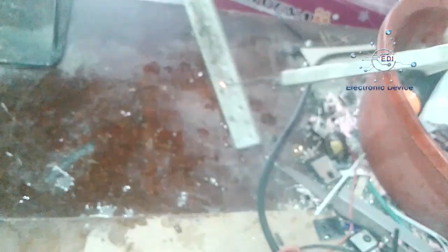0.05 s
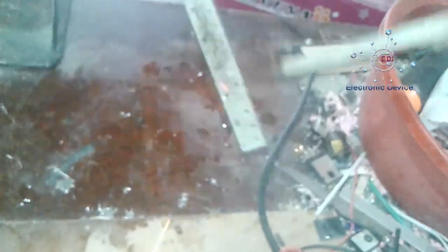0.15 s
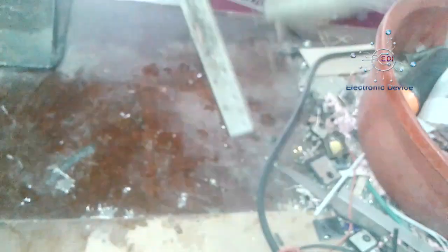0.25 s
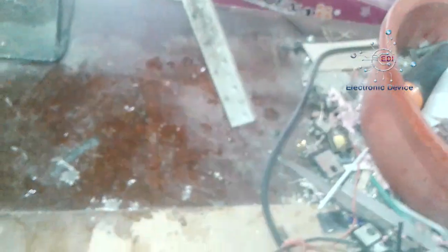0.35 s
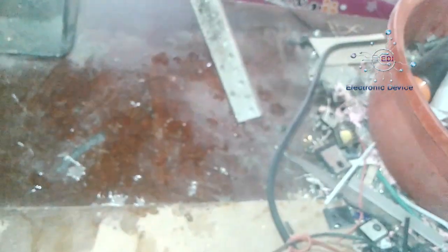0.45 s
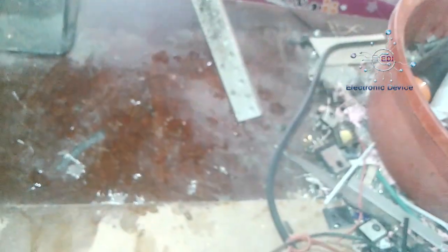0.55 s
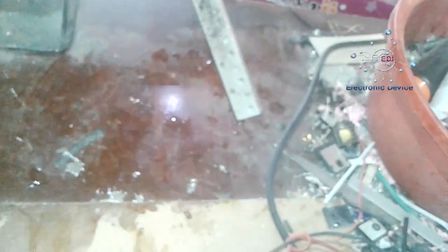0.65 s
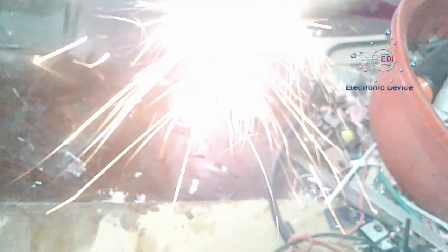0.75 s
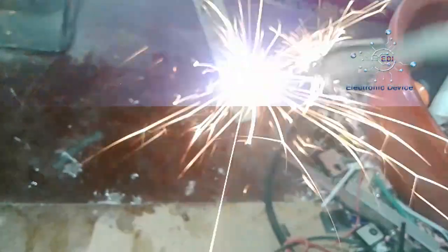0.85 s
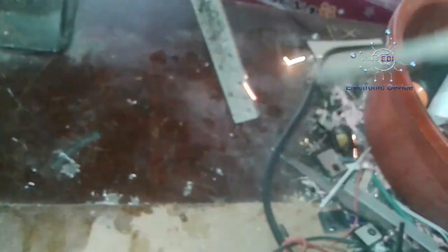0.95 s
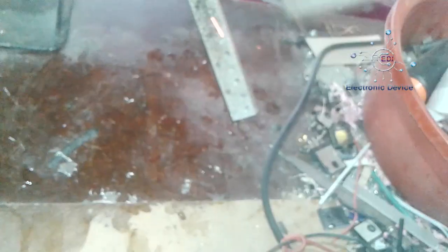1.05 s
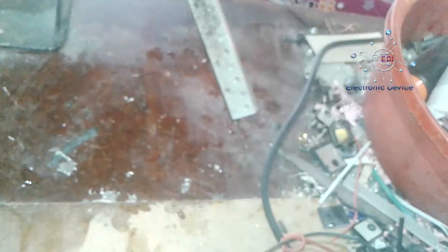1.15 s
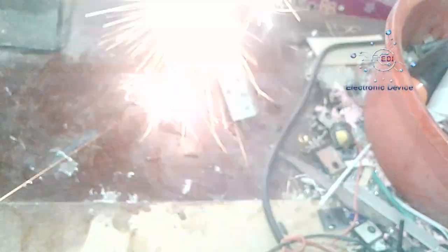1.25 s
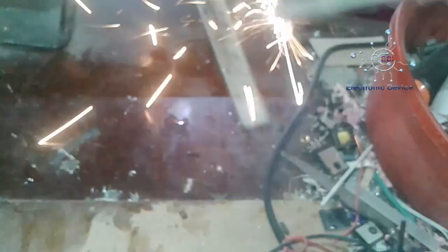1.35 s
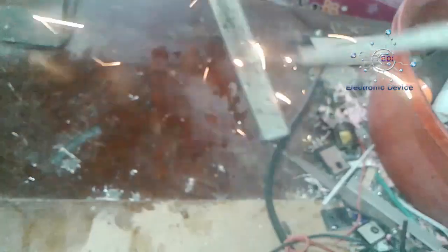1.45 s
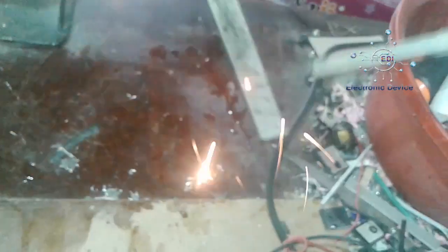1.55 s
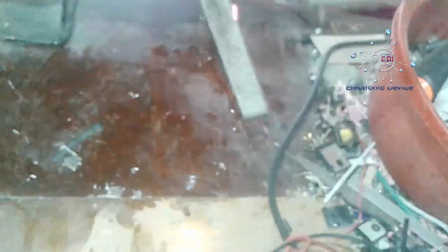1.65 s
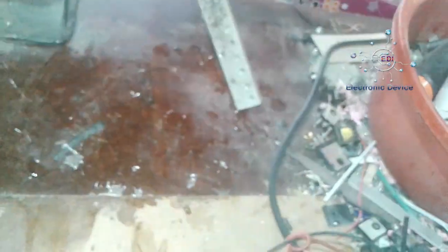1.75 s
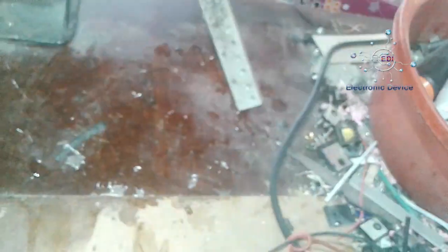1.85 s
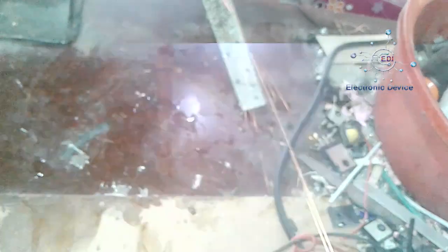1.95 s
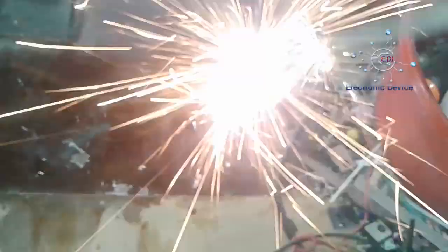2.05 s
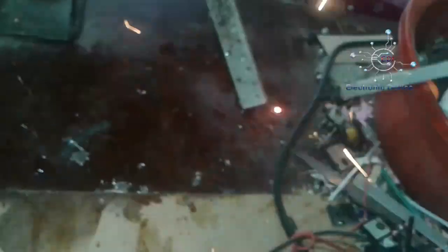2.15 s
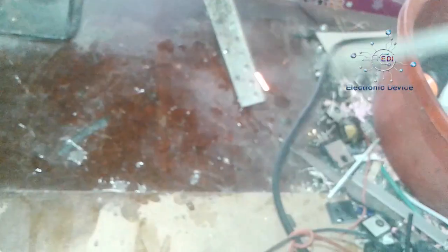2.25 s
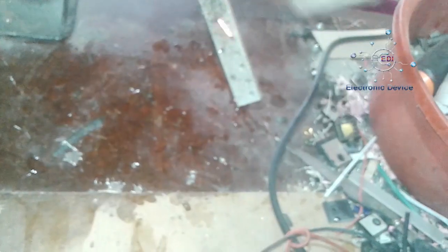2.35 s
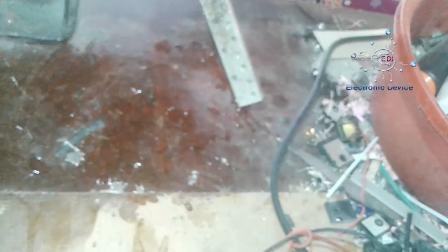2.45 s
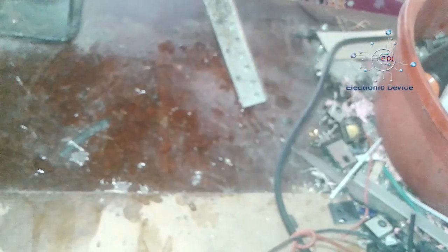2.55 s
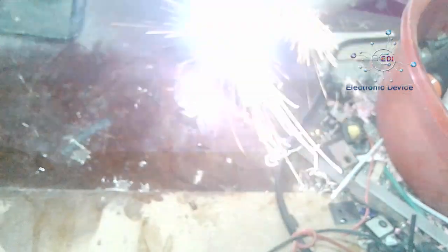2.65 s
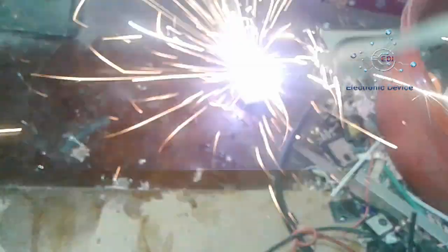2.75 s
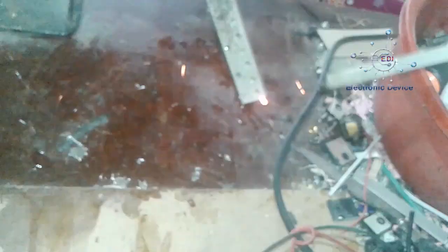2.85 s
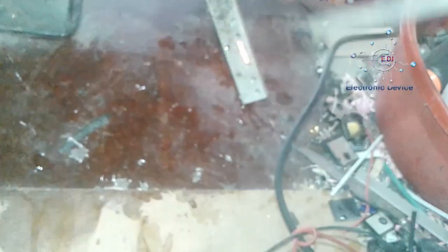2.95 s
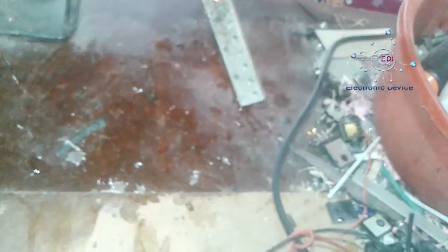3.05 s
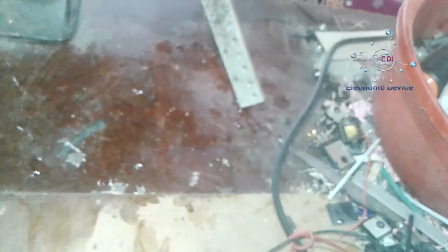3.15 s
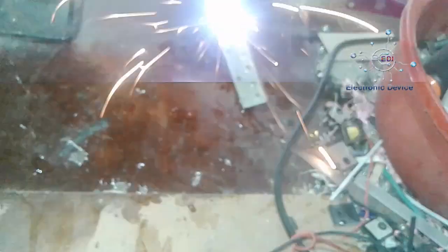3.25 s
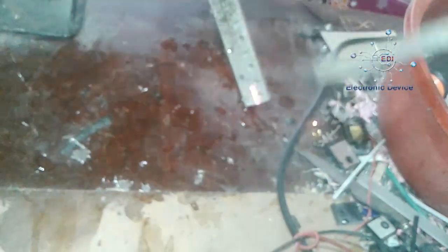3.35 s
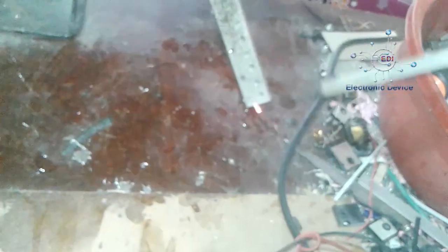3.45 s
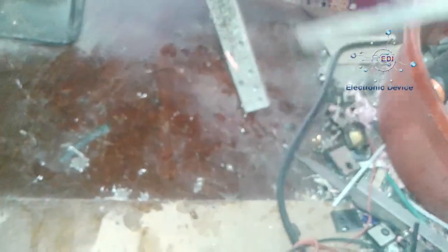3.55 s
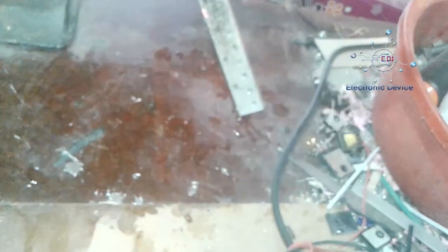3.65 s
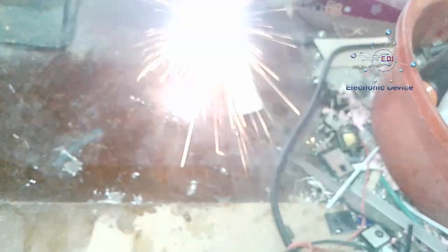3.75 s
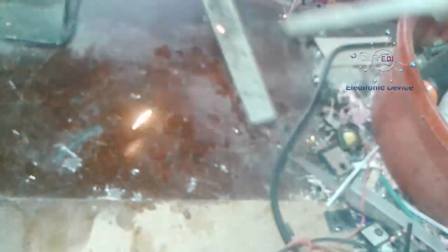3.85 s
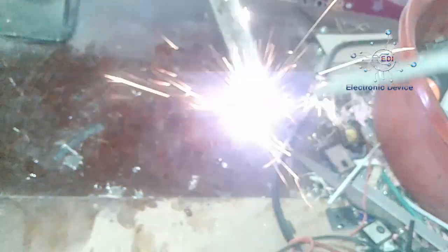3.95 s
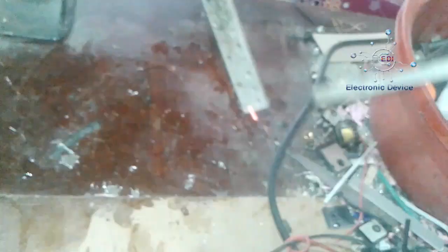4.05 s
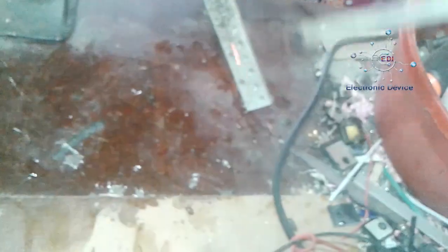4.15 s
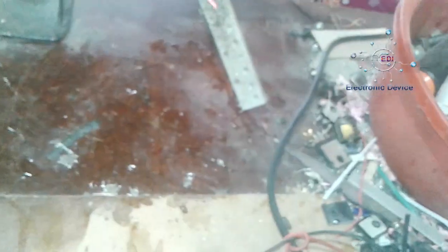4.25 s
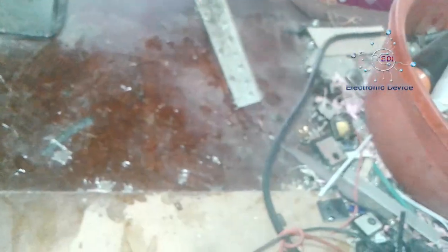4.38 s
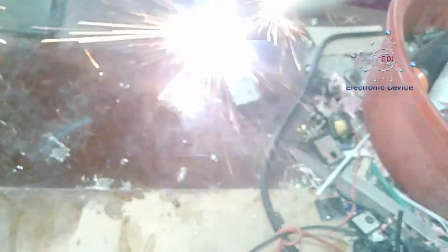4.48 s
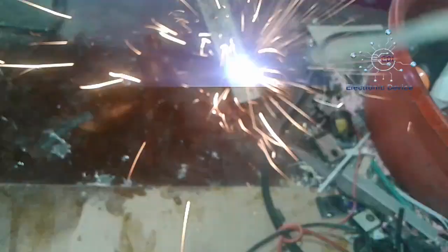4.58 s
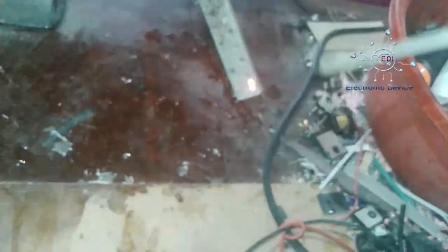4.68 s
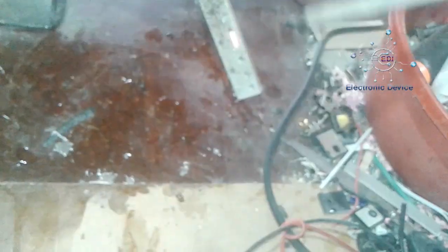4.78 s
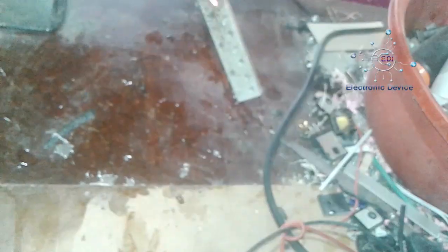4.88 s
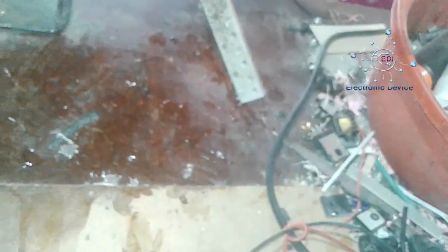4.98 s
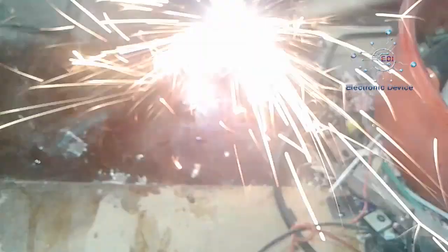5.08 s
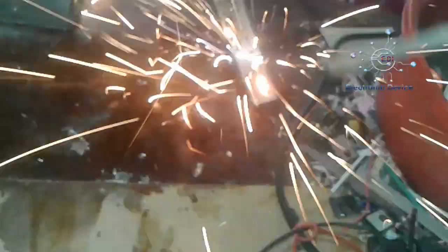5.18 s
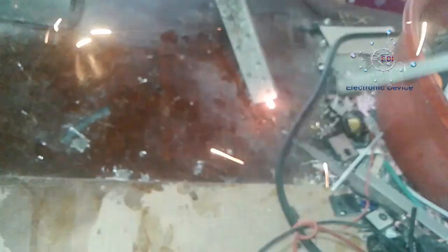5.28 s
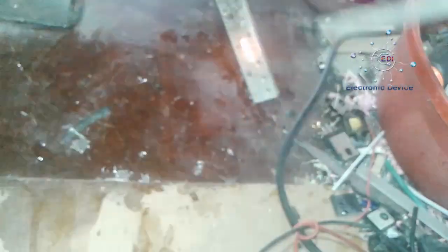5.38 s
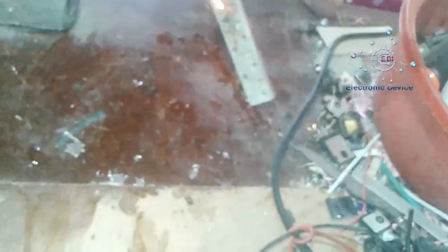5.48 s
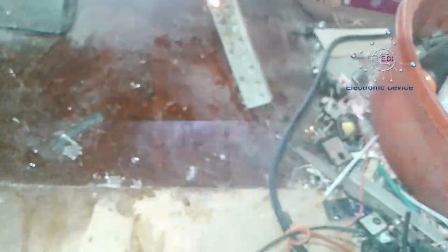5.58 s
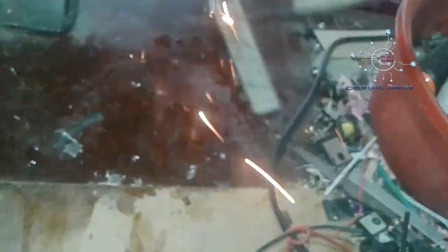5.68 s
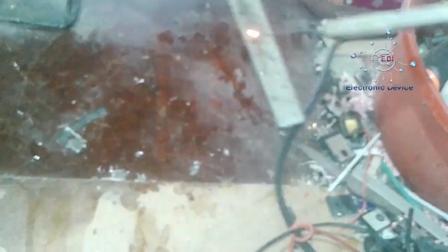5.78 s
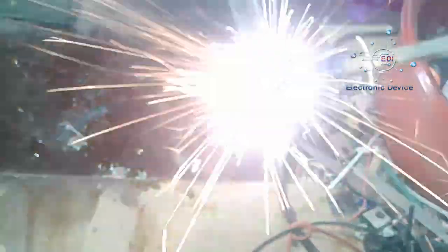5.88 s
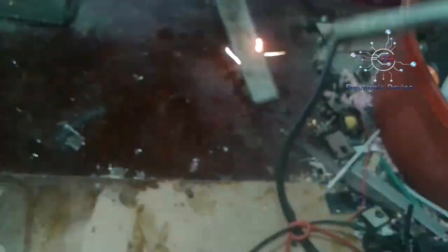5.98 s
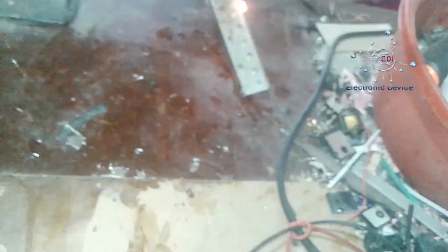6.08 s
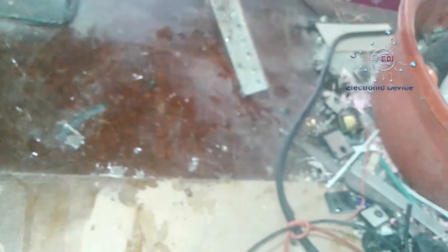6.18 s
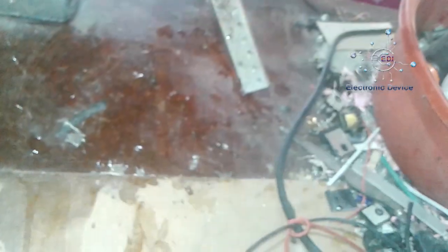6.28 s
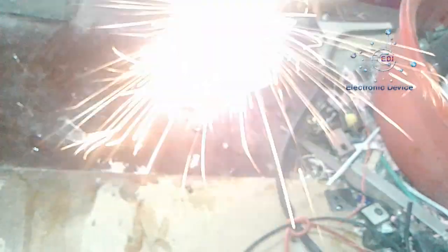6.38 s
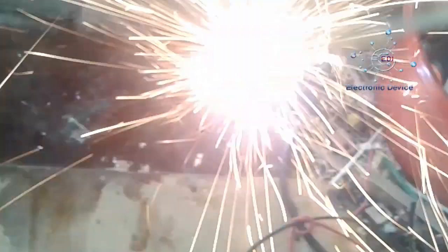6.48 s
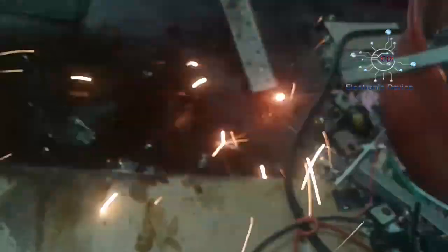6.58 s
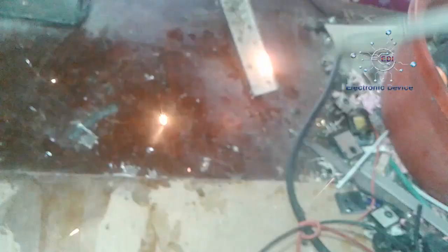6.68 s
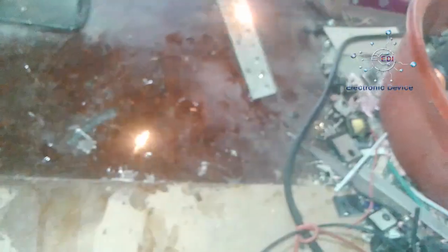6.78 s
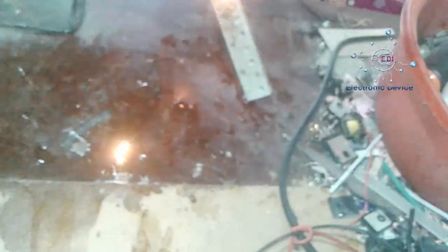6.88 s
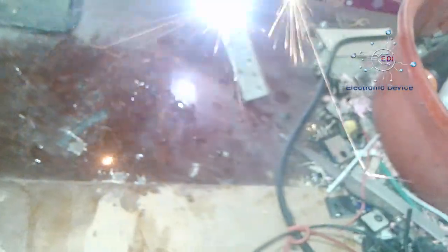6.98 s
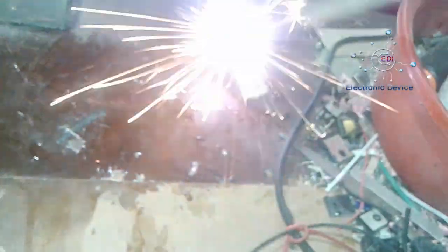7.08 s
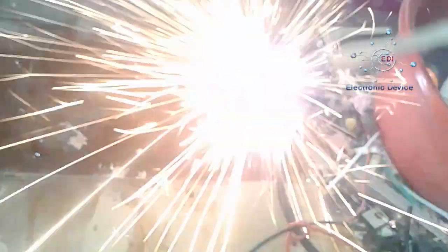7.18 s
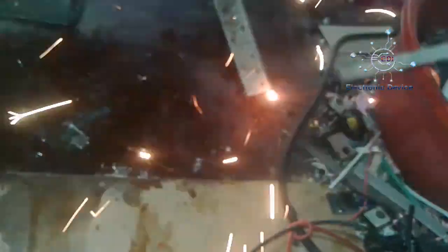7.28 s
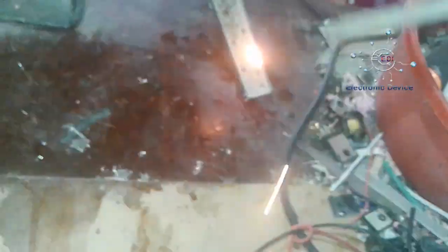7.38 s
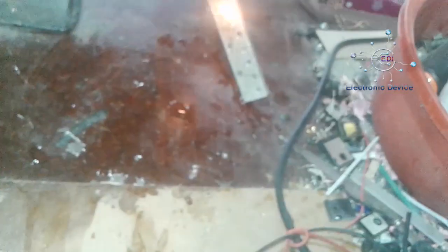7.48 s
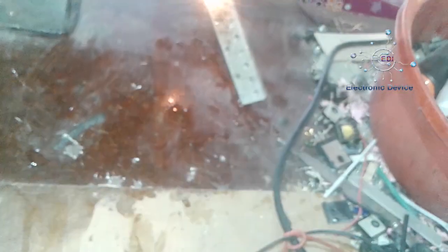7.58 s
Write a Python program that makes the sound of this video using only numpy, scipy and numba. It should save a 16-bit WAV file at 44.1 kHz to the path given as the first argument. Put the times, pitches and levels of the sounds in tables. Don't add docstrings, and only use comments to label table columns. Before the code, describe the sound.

A close phone microphone in a reverberant workshop catches the dying hiss of an earlier arc, then a rapid, bright inverter ticking, a buzzy whine of roughly 150 to 230 ticks per second that flips between faster and slower about eight times a second. Small snaps come near 0.03 and 0.15 seconds. A violent crackling burst hits at 0.7 to 0.87, with more at 1.3 to 1.55, 2.05 to 2.14, 2.7 to 2.82 and 3.25 to 3.3. Scattered snaps at 3.8 to 4.05 lead to bursts at 4.5 to 4.6, 5.1 to 5.25, 5.7 to 5.97, 6.4 to 6.6 and 7.03 to 7.27. Each mixes piercing cracks, short thumps, sizzling spray and rough molten bubbling, with brief wall echoes. The ticking ducks around the loudest peaks, then recovers. Dull soft knocks fall around 1.2, 1.7, 2.4, 6.1, 6.3 and 7.4, over quiet, uneven low rumble.

```python
import sys
import numpy as np
from scipy import signal
from scipy.fft import rfft, irfft, next_fast_len
from scipy.io import wavfile
from scipy.ndimage import uniform_filter1d, minimum_filter1d
from numba import njit

SR = 44100
rng = np.random.default_rng(int(sys.argv[2]) if len(sys.argv) > 2 else 0)


def gain_from_db(level_db):
    decades = np.asarray(level_db, float) / 20
    return 10 ** decades


def materialize(psi):
    bounded = np.clip(np.atleast_2d(psi).T, -1, 1)
    quanta = np.round(bounded * 32767).astype(np.int16)
    wavfile.write(sys.argv[1], SR, quanta)


N = 336483

# start_s, length_s, snap_peak, thump_db, crack_db
CONTACTS = [(.724, .082, 1, -14.5, -17), (1.302, .045, 0.42, -16, -3.5), (1.349, .017, 0.91, -28, -10),
            (1.374, .007, .5, -27, -11), (1.393, .012, 0.32, -31, -18), (1.431, .014, 0.15, -46, -18),
            (2.066, 0.013, 0.22, -18, -13), (2.081, 0.054, 0.61, -16.5, -1.5),
            (2.725, .061, 0.76, -17.5, -11), (2.786, .017, 0.74, -25, -3), (3.274, .026, 0.2, -8.5, 6.5),
            (4.54, .092, 0.44, -20, 0.5), (5.177, .029, 0.31, -12, -3), (5.895, .022, 0.23, -11, 1.5),
            (5.956, .022, 0.33, -22, -4), (6.425, .065, 0.47, -24.5, -11.5), (6.507, .035, 0.18, -26, -9),
            (6.545, .062, 0.34, -13, 2.5), (7.133, .088, 0.46, -18, 0.5), (7.235, .031, 0.52, -17, -0.5)]
# start_s,
# signed_snap_peak, thump_db, crack_db
LISTED_ARCS = [(0.0259, 0.07, -48, -16), (0.1535, 0.15, -19, -2), (0.6982, -0.74, -9.5, -3),
               (0.8601, -0.75, -9, 14), (0.8693, -0.74, -10, 3), (1.4247, 0.28, -37, -5.5),
               (1.5517, 0.22, -47, -11.5), (2.715, -0.17, -3.5, 3), (2.7212, -0.99, -23, 11),
               (3.2449, 0.13, -13, -14), (3.8119, -0.37, -26, -27), (3.8487, 0.056, -43, -22),
               (3.8992, 0.18, -53, -30), (3.9791, -0.17, -46, -4), (3.993, -0.57, -28, -17),
               (4.0053, -0.37, -47, 5), (4.0246, 0.84, -15, 13.5), (4.0325, -2.6, -9, -16),
               (4.499, 0.23, -25.5, -13), (5.115, -0.54, -24, -0.5), (5.2411, 0.3, -16, 2),
               (5.6874, -0.37, -29, 4), (5.6989, -0.65, -43, -14), (5.7118, 1, -22, -25),
               (5.7739, 0.14, -27, -14), (5.8533, 0.045, -59, -25), (7.0335, -1.14, -14.5, 1),
               (7.0505, 1, -9, 10), (7.055, -1.1, -33, -5), (7.0888, 0.81, -7.5, 9),
               (0.726, 0.85, -21, 12.5), (0.7519, 1, -15, 14), (0.765, 0.54, -10, 16.5), (0.7868, -1.6, -8, 4),
          (0.7894, 0.7, -1, 11.5), (0.8042, -0.81, -5, 10), (1.318, 0.082, -19, 6), (1.3315, -1.3, -25, 7),
          (2.109, 1, -7, 2), (2.1188, -1.6, -11, -6), (2.128, 0.78, -16, 3), (2.1423, 0.32, -8.5, 7),
          (2.7461, 0.9, -4, -12), (2.773, -0.03, -12, 15), (2.8145, 0.7, -7, 9.5), (3.2748, 1, -14, 13),
          (3.282, -0.2, -6, 11.5), (3.2859, -0.39, -9, 9), (3.291, 0.26, -10, 7), (4.5379, -0.37, -9.5, -1),
          (4.5918, -0.71, -8, 10), (4.608, 0.6, -5, -10), (5.1909, -0.034, -7.5, 11),
          (5.9029, 0.073, -14, 10), (6.4176, -0.39, -2, 9.5), (6.4827, 0.42, -9, 5),
          (6.5496, 0.021, -11, 5), (6.585, 0.89, -7, 9), (7.0944, -1.3, -8.5, -2), (7.118, -0.77, -7.5, 10)]
# start_s, length_s, snap_peak
FIZZ = [(0.702, .024, 0.4), (1.294, .008, 0.4), (2.055, .017, 0.32), (3.31, .013, 0.26), (3.82, .009, .18),
        (4.487, .006, 0.12), (5.121, .025, 0.17), (5.226, .024, .22), (6.493, .018, .18),
        (7.052, .014, 0.12), (7.104, .035, 0.16), (7.223, .012, 0.27)]
# start_s, signed_snap_peak
STRAY_SPARKS = [(0.0615, 0.07), (0.0728, 0.07), (0.1656, 0.17), (0.8793, -0.2), (1.4507, 0.13),
                (1.5315, 0.03), (1.538, .2), (3.8332, .12), (5.2107, .25), (2.1354, -0.22), (2.8088, -0.22),
                (2.8231, 0.2), (4.043, 0.2), (5.1664, -0.16), (5.6906, 0.11), (5.86, 0.08), (5.9234, -0.25),
                (5.9523, 0.25), (7.0435, 0.17), (5.9638, .18)]
# start_s, crack_db
STRIKES = [(0.154, -0.5), (0.6966, 13.5), (1.296, 5.5), (1.5524, -33), (2.047, 7), (2.7134, 15.5),
           (3.245, 7), (3.272, -21), (3.811, -14), (3.848, -12.5), (3.979, -4), (4.4902, 0), (4.5386, 6.5),
           (5.1153, -25), (5.1774, -15), (5.6857, 6), (5.897, -13), (6.4167, 12.5), (7.031, 14.5)]
# frequency_hz, level_db
CRACK_COLOUR = [(150, -48), (450, -27), (1000, -27.5), (2000, -24.5), (3700, -21), (5500, -11.5),
                (6500, -5), (7250, 0), (8200, -5.5), (9600, -11), (12000, -14.5), (15500, -19)]
# frequency_hz, level_db
SPUTTER_COLOUR = [(100, 1.5), (300, -1.5), (1500, -7.5), (4000, -4.5), (9000, -43.0)]
BOIL_COLOUR = [(90, -9.0), (500, -4), (1200, -10.5), (3500, -12.0)]
# time_s, fast_gap_ms, slow_gap_ms, fast_run_ms
TICK_SPACING = [
    (.5, 4.403, 6.601, 49),
    (2.5, 4.376, 6.554, 48.6),
    (4.5, 4.323, 6.437, 47.6),
    (5.5, 4.296, 6.381, 47.25),
    (7.5, 4.263, 6.310, 46.9),
]
# cycle_number, fast_run_start_s
SWITCH_CYCLES = [(0, .0159), (5, .6571), (9, 1.1688), (13, 1.6842), (14, 1.812), (15, 1.9455), (18, 2.3398),
                 (20, 2.6062), (23, 2.9993), (27, 3.5295), (29, 3.7938), (33, 4.3199), (38, 4.9751),
                 (43, 5.6267), (47, 6.1443), (53, 6.9212), (58, 7.5656)]
# delay_ms, signed_gain
TICK_PATHS = [(0, 1.06), (.153, .22), (.283, -.17), (.34, .28), (.402, .19), (.618, -.68), (1.015, -.29),
              (1.23, .67), (1.735, -.3), (2.012, .22), (2.45, .2), (2.897, .2)]
# frequency_hz, level_db
TICK_COLOUR = [(1500, -41), (2300, -37.5), (3000, -19), (3700, -26), (4400, -3.5), (5500, -4.5), (7300, 1),
               (9000, 0), (10300, -12), (11700, -22), (12700, -15), (14800, -13), (16200, -33)]
# pitch_hz, width_hz, level_db
CASE_MODES = [(2930, 260, 8.5), (4400, 190, -11), (12350, 560, 8), (15100, 600, 2.5)]
# frequency_hz, t60_s
ROOM_T60 = [(200, 0.18), (500, 0.27), (1500, 0.28), (4000, 0.29), (8000, 0.24), (15000, 0.25)]
# start_s, peak_db
KNOCKS = [(1.24, -29), (1.74, -27), (2.439, -29), (6.091, -28), (6.264, -26), (7.426, -29)]
# frequency_hz, level_db
SHOP_COLOUR = [(18, -44), (30, 6), (126, -3), (207, -3), (369, -9.5), (433, -14), (644, -7), (2170, -16),
               (2980, -33), (3500, -14.5), (4550, -27), (7700, -120)]
# time_s, level_db
RUMBLE = [(.1, -57), (.4, -59.5), (1.1, -60), (1.7, -59), (2.0, -51), (2.35, -68), (2.62, -49), (3.0, -57),
          (3.6, -56), (4.3, -64), (4.9, -57), (5.5, -64), (5.8, -54), (6.95, -53), (7.5, -58)]

ARC_LATE_MS, ARC_JITTER_MS = .3, .15
SNAP_SPREAD_DB, THUMP_SPREAD_DB, CRACK_SPREAD_DB = 2.5, 1, 7
CLEAR_S, PUSH_SHARE = .0022, .88
TICK_DB, TICK_WET_DB, SHOP_DB = -27.5, -8.5, -49
LIMIT_SLOPE, AHEAD_S, CEILING, TOP_HZ = .7, .028, .69, 15900


def colour(x, table):
    hz, db = np.transpose(table)
    n = next_fast_len(len(x))
    f = np.arange(n // 2 + 1) * SR / n + 1
    gain = gain_from_db(np.interp(np.log(f), np.log(hz), db))
    y = irfft(rfft(x, n) * gain, n)[:len(x)]
    return y / np.sqrt(np.mean(y ** 2))


def causal(table, size=512):
    hz, db = np.transpose(table)
    f = np.arange(2049) * SR / 4096 + 1
    log_gain = np.interp(np.log(f), np.log(hz), db) * np.log(10) / 20
    ceps = irfft(log_gain)
    ceps[1:2048] *= 2
    h = irfft(np.exp(rfft(ceps[:2049], 4096)))[:size]
    return h / np.sqrt(np.sum(h ** 2))


def clicks(s, size):
    at = np.clip(np.asarray(s) * SR, 8, N - 10)
    i = at.astype(int)[:, None] + np.arange(-7, 9)
    off = i - at[:, None]
    shape = np.sinc(off) * np.cos(np.pi * off / 16) ** 2
    return np.bincount(i.ravel(), (shape * np.asarray(size)[:, None]).ravel(), N)


def ring(x, h):
    return signal.fftconvolve(x, h)[:N]


def room(build_ms=9.3):
    t, h = np.arange(SR) / SR, 0
    hz, t60 = np.transpose(ROOM_T60)
    for f in 177 * 2. ** np.arange(7):
        band = signal.butter(3, [f / 2 ** .5, f * 2 ** .5], "band", fs=SR, output="sos")
        octave_t60 = np.interp(np.log(f), np.log(hz), t60)
        h = h + signal.sosfilt(band, rng.standard_normal(SR)) * gain_from_db(-60 * t / octave_t60)
    h = h * (1 - np.exp(-t * 1000 / build_ms))
    return h / np.sqrt(np.sum(h ** 2))


def discharges(ticks):
    listed = np.array(LISTED_ARCS)
    late, snap, thump, crack = rng.standard_normal((len(ticks), 4)).T
    pushes = rng.random(len(ticks)) < PUSH_SHARE
    s = ticks + (ARC_LATE_MS + ARC_JITTER_MS * late) / 1000
    free = np.abs(ticks[:, None] - listed[:, 0]).min(axis=1) > CLEAR_S
    size = np.where(pushes, 1, -1) * gain_from_db(SNAP_SPREAD_DB * snap)
    arcs, sparks = [listed], [STRAY_SPARKS]
    for start, length, peak, thump_db, crack_db in CONTACTS:
        during = free & (ticks > start) & (ticks < start + length)
        thumps_db = thump_db + THUMP_SPREAD_DB * thump
        cracks_db = crack_db + CRACK_SPREAD_DB * crack
        arcs.append(np.c_[s, peak * size, thumps_db, cracks_db][during])
    for start, length, peak in FIZZ:
        during = free & (ticks > start) & (ticks < start + length)
        sparks.append(np.c_[s, peak * size][during])
    return np.vstack(arcs), np.vstack(sparks)


def snaps(arcs, sparks, width_ms=0.076, thump_hz=170, thump_ms=1.8):
    s, snap, thump_db, _ = arcs.T
    faint_s, faint_snap = sparks.T
    t = np.arange(-32, 800) / SR
    spike = np.exp(-.5 * (t * 1000 / width_ms) ** 2)
    spike = spike - 0.3 * np.exp(-.5 * ((t * 1000 - .33) / 0.22) ** 2)
    thump = -np.sin(2 * np.pi * thump_hz * t) * np.exp(-t * 1000 / thump_ms) * (t > 0)
    lead = np.where(snap < 0, .0012, 0)
    spikes = 2.6 * clicks(s + t[0], snap) + 1.03 * clicks(faint_s + t[0], faint_snap)
    thumps = clicks(s + t[0] - lead, gain_from_db(thump_db + 11.5))
    thumps = thumps + 0.81 * clicks(faint_s + t[0], faint_snap ** 2)
    return ring(spikes, spike) + ring(thumps, thump)


def cracks(arcs, sparks, tail, burst_ms=1.36, shock_db=5.0, wet_db=18.0, near_db=6.0, sputter_db=-10):
    s, db = np.concatenate([np.array(table)[:, [0, -1]] for table in (arcs, STRIKES)]).T
    near_s, snap = np.concatenate([np.array(table)[:, :2] for table in (arcs, sparks)]).T
    shock = clicks(s, gain_from_db(db + 2.0) * rng.choice([-1, 1], len(s)))
    fade = np.exp(-np.arange(1000) / SR * 1000 / burst_ms)
    near = clicks(near_s - .0002, gain_from_db(near_db) * np.abs(snap))
    glow = ring(clicks(s, gain_from_db(db - 5.5)) + near, fade)
    n = len(arcs)
    first = clicks(s[n:], gain_from_db(db[n:] - 3.5))
    later = clicks(s[:n], gain_from_db(db[:n] - 1.5) * rng.choice([-1, 1], n))
    walls = ring(first + 0.27 * near, room()) + ring(later, tail)
    spray = glow * rng.standard_normal(N)
    air = gain_from_db(shock_db) * (shock + near) + spray + gain_from_db(wet_db) * walls
    grit = glow * rng.standard_normal(N) * gain_from_db(0.45 * rng.exponential(size=N))
    sputter = ring(grit, causal(SPUTTER_COLOUR))
    return ring(air, causal(CRACK_COLOUR)) + gain_from_db(sputter_db) * sputter


def boil(arcs, db=-4.0, fade_ms=4.6):
    s, _, thump_db, _ = arcs.T
    cooling = np.exp(-np.arange(2000) / SR * 1000 / fade_ms)
    heat = ring(clicks(s, gain_from_db(thump_db + db)), cooling)
    grit = rng.standard_normal(N) * gain_from_db(4.4 * rng.exponential(size=N))
    return ring(heat * grit, causal(BOIL_COLOUR))


def tick_times(sag=0.0042):
    s, fast, slow, run_ms = np.transpose(TICK_SPACING)
    cycle_s = np.interp(np.arange(SWITCH_CYCLES[-1][0] + 1), *np.transpose(SWITCH_CYCLES))
    slow_s = cycle_s + np.interp(cycle_s, s, run_ms) / 1000
    starts = np.c_[cycle_s, slow_s].ravel()
    ends = np.append(starts[1:], N / SR)
    out = []
    for k, (start, end) in enumerate(zip(starts, ends)):
        is_slow = k % 2
        gap = np.interp(start, s, slow if is_slow else fast) / 1000
        n = np.arange(max(round((end - start) / gap - .2), 1))
        creep = (1 if is_slow else -1) * sag * n * (n - len(n)) / 6
        out.append(start + gap * (n + creep))
    return np.concatenate(out)


def inverter(ticks, tail):
    s = ticks + .0001
    size = gain_from_db(0.15 * rng.standard_normal(len(s)))
    wander = rng.standard_normal((len(TICK_PATHS), len(s)))
    drift = 1 + 1.1 * uniform_filter1d(wander, 25, axis=1)
    paths = [clicks(s + ms / 1000, gain * size * d) for (ms, gain), d in zip(TICK_PATHS, drift)]
    direct, bounces = paths[0], sum(paths[1:])
    treble = signal.sosfiltfilt(signal.butter(4, 10300, "high", fs=SR, output="sos"), bounces)
    case = 0
    for hz, width, db in CASE_MODES:
        case = case + gain_from_db(db) * signal.lfilter(*signal.iirpeak(hz, hz / width, SR), direct)
    tick = ring(direct + bounces - treble / 2 + case, causal(TICK_COLOUR))
    tick = tick / np.sqrt(np.mean(tick ** 2))
    return gain_from_db(TICK_DB) * (tick + gain_from_db(TICK_WET_DB) * ring(tick, tail))


def knocks(hz=190, ring_ms=2.1):
    s, db = np.transpose(KNOCKS)
    t = np.arange(2000) / SR
    bump = np.sin(2 * np.pi * hz * t) * np.exp(-t * 1000 / ring_ms)
    return ring(clicks(s + 0.0028, gain_from_db(db)), bump)


def earlier_arc(tail, db=-5.0, ago_s=.06):
    burst_s = .1
    hiss = colour(rng.standard_normal(SR), CRACK_COLOUR) * (np.arange(SR) < SR * burst_s)
    rest = signal.fftconvolve(hiss, tail)[int(SR * (burst_s + ago_s)):SR]
    out = np.zeros(N)
    out[:len(rest)] = gain_from_db(db) * rest
    return out


def shop(patchy_db=2.5, split_hz=260):
    steps = np.repeat(rng.standard_normal(N // 1500 + 1), 1500)
    walk = uniform_filter1d(steps, 1500)[:N]
    air = gain_from_db(SHOP_DB) * colour(rng.standard_normal(N), SHOP_COLOUR)
    low = signal.sosfilt(signal.butter(2, split_hz, fs=SR, output="sos"), air)
    swell_db = np.interp(np.arange(N) / SR, *np.transpose(RUMBLE)) + 58 + 0.93 * patchy_db * walk
    return gain_from_db(patchy_db * walk) * (air - low) + gain_from_db(swell_db) * low


def scene():
    tail, ticks = room(), tick_times()
    arcs, sparks = discharges(ticks)
    burst = gain_from_db(6.5) * (snaps(arcs, sparks) + cracks(arcs, sparks, tail) + boil(arcs))
    mix = burst + inverter(ticks, tail) + knocks() + earlier_arc(tail) + shop()
    return mix[None]


@njit
def follow(x, release):
    e, out = 0., np.empty(len(x))
    for i in range(len(x)):
        e = max(x[i], e * release)
        out[i] = e
    return out


def top_cut(x):
    return signal.sosfilt(signal.butter(12, 16730, fs=SR, output="sos"), x)


def record(dry, top=1.0, release_s=0.075, drive=1.487):
    x = signal.sosfilt(signal.butter(3, 100, "high", fs=SR, output="sos"), dry)
    level = follow(uniform_filter1d(np.abs(x[0]), 88) * 2, np.exp(-1 / (release_s * SR)))
    gain = np.minimum(1, (top / (level + 1e-9)) ** LIMIT_SLOPE)
    k = int(AHEAD_S * SR)
    gain = minimum_filter1d(gain, k, origin=-(k // 2))
    gain = uniform_filter1d(gain, k, origin=(k - 1) // 2)
    x = CEILING * np.tanh(drive * x * gain)
    x = signal.sosfilt(signal.butter(2, 55, "high", fs=SR, output="sos"), x)
    x = signal.sosfilt(signal.ellip(10, .2, 75, TOP_HZ, fs=SR, output="sos"), x)
    return top_cut(x)


dry = scene()
out = record(dry)
materialize(out)
```